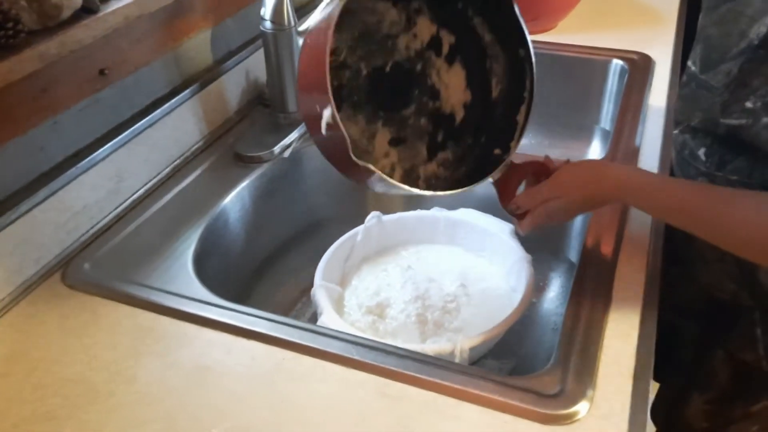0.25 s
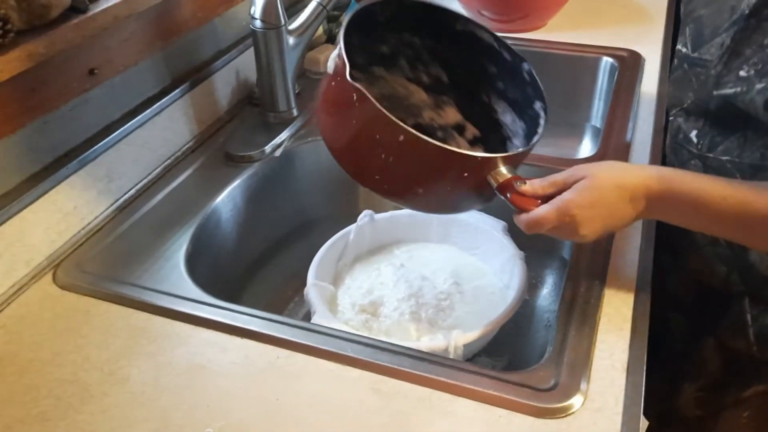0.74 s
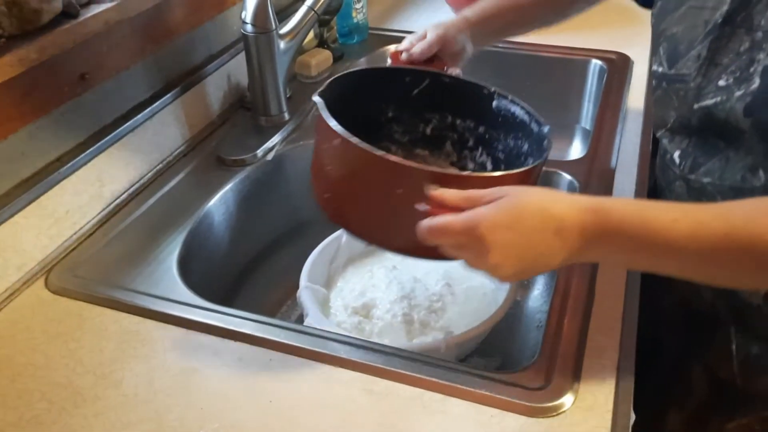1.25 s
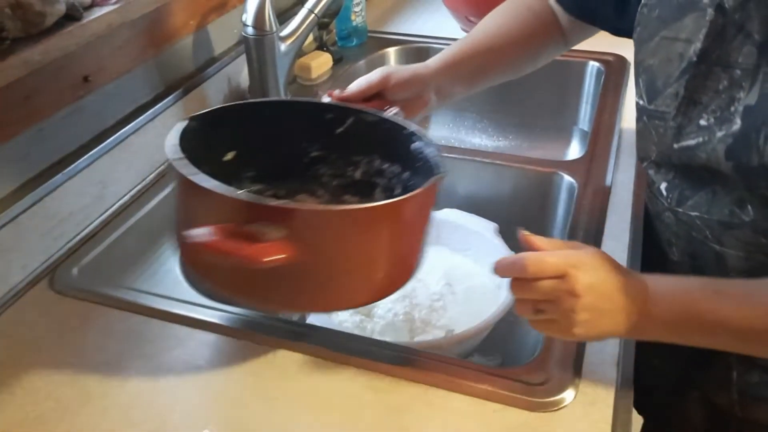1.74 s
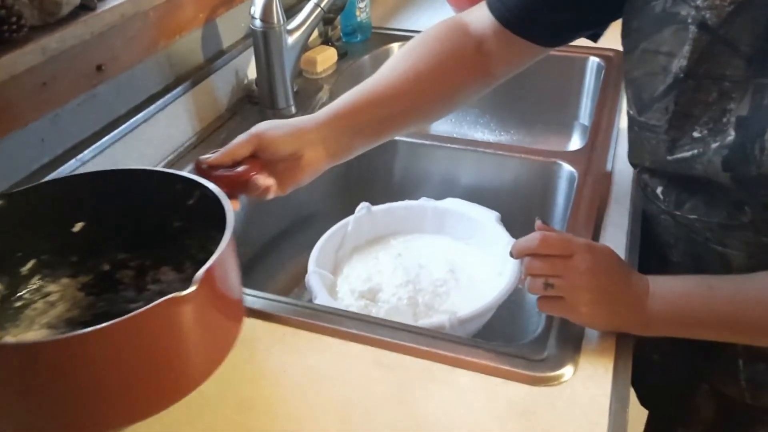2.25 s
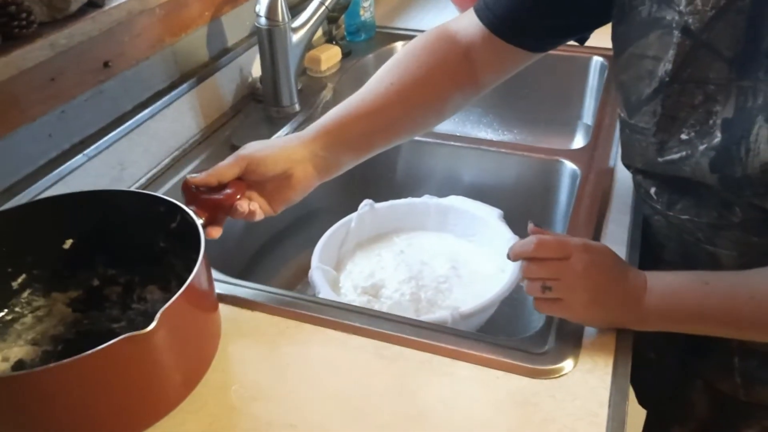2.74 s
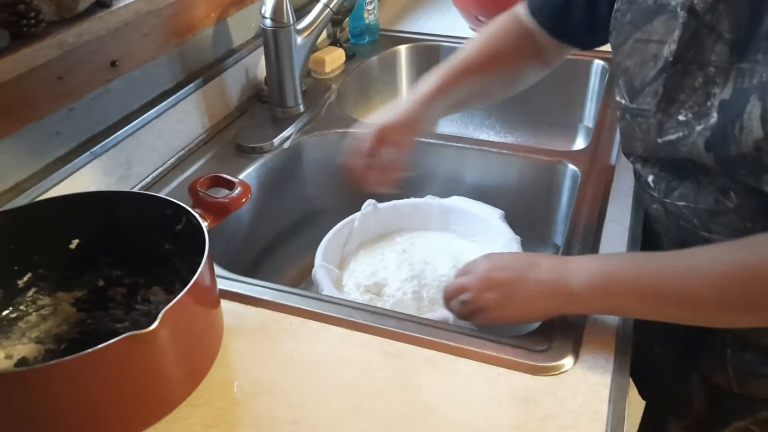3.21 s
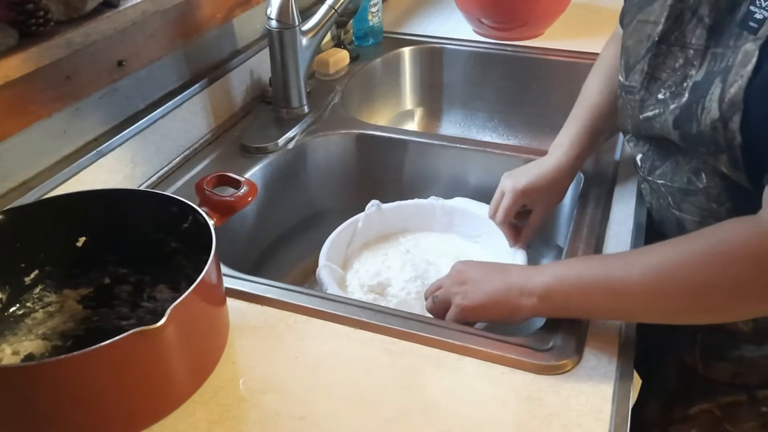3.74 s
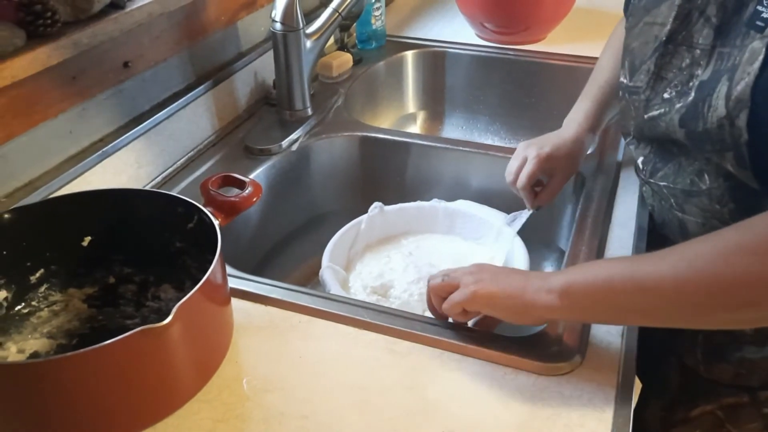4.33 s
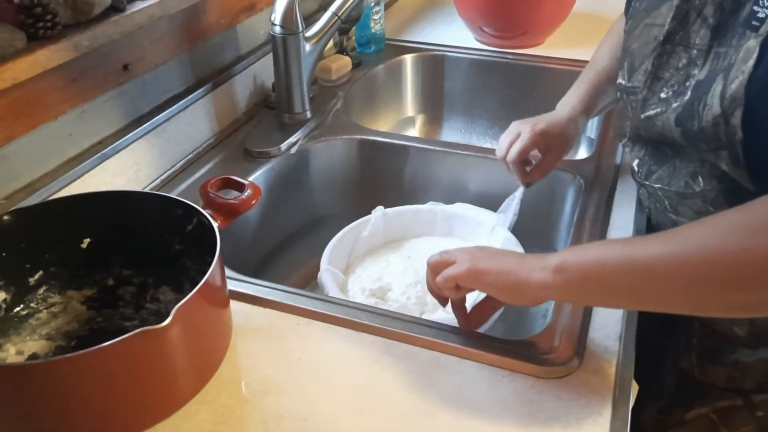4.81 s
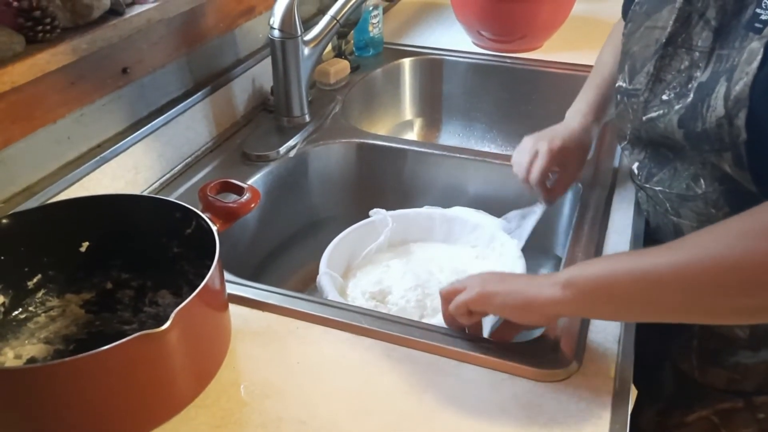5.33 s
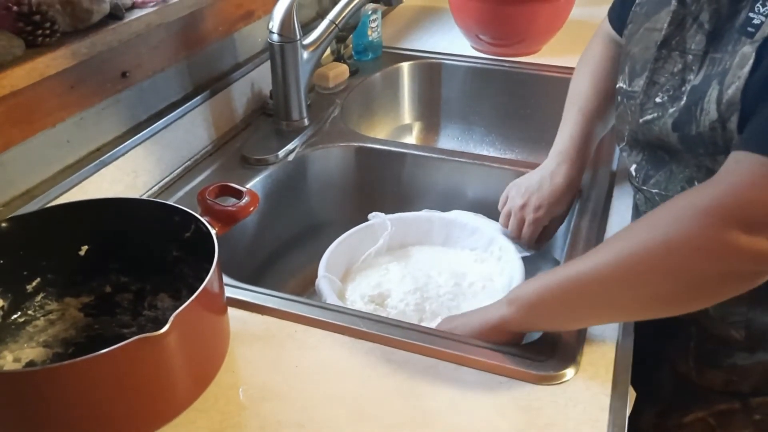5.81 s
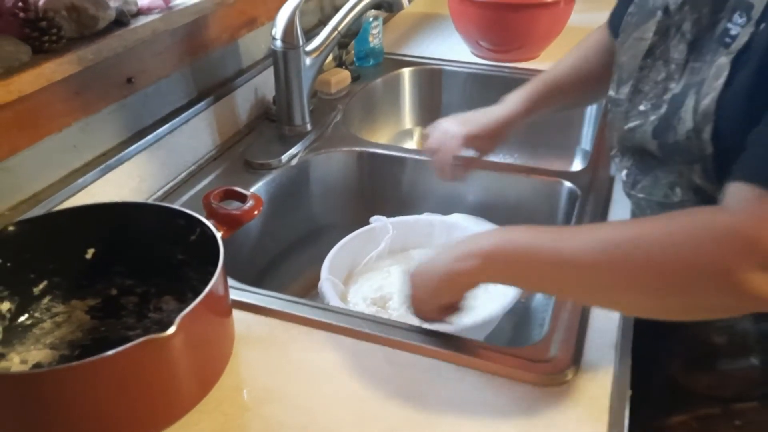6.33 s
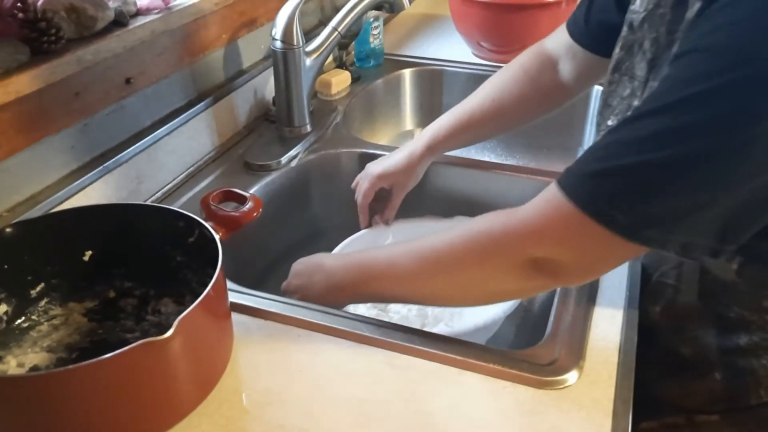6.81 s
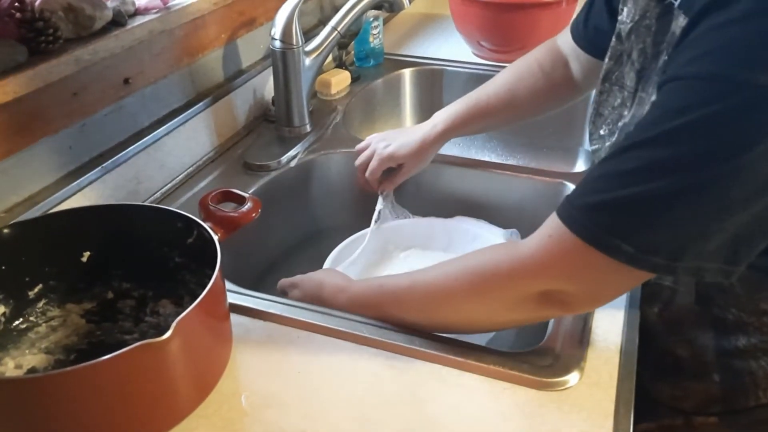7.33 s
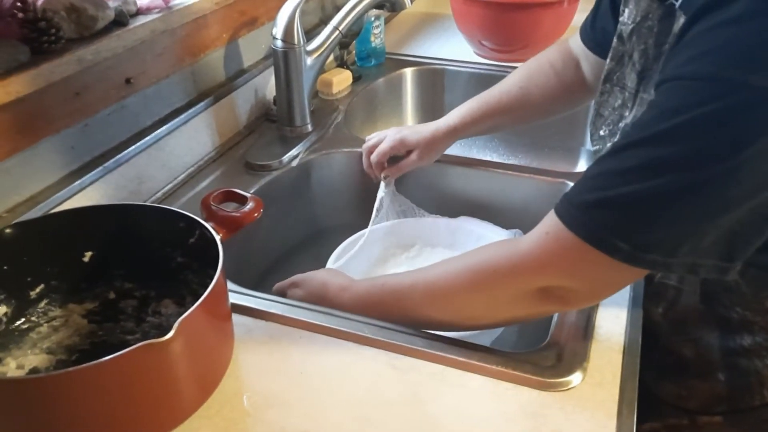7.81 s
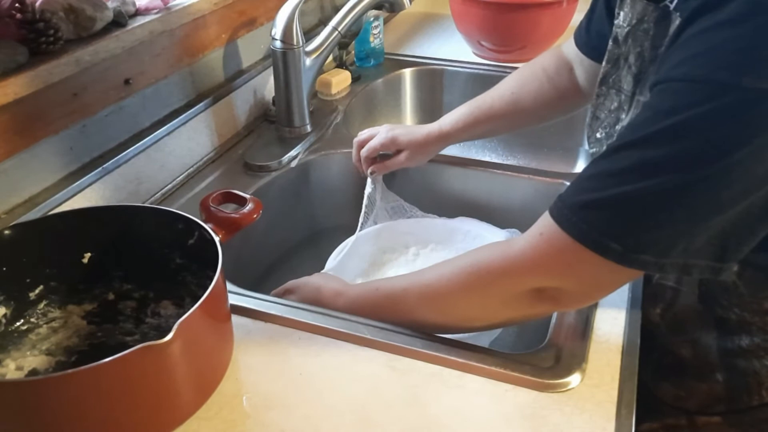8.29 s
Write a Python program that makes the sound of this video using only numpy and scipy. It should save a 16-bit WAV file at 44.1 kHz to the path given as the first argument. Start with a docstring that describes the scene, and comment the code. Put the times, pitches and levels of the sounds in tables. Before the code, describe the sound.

Close in a small kitchen, whey drips from fresh curds in a steel sink with hollow plops, tinny ticks and wet snaps. A heavy pot lands on the counter with a loud, ringing clunk, chatters and settles. Drips thin out as hands tug wet cloth with soft rustles and squelches. A fan hums faintly under thin hiss; the stereo microphone briefly dips after the blow.

```python
"""Draining curds at a kitchen sink

Whey drips and seeps from curds in a cloth-lined colander in a steel sink: ringing bubbles, splashes, wet snaps.
The emptied pot clunks onto the counter, chatters and settles: blows ring the modes of pot and counter.
Hands then gather the wet cloth, a patter of slipping fibres, and the colander knocks once.
A fan, noise through housing resonances, hums in the small room under a thin hiss.
The camera's two microphone ports hear it; its gain control ducks at the clunk and slowly recovers."""
import sys
import numpy as np
from scipy import signal
from scipy.fft import rfft, irfft, next_fast_len
from scipy.io import wavfile
from scipy.ndimage import uniform_filter1d, minimum_filter1d

SR = 44100
rng = np.random.default_rng(int(sys.argv[2]) if len(sys.argv) > 2 else 0)


def dump(signal):
    """Clip the signal to [-1, 1] and save it as 16-bit WAV at the path in sys.argv[1]."""
    limited = np.clip(np.atleast_2d(signal).T, -1, 1)
    pcm = np.round(limited * 32767).astype(np.int16)
    wavfile.write(sys.argv[1], SR, pcm)


N = 377491  # samples

# Modes of the loaded counter top. Each row: frequency in Hz, relative level in dB, 60 dB decay time in s.
COUNTER_MODES = [(67, -25.5, 0.24), (143.5, -2.5, 0.55), (204.3, -13.5, 0.41), (301, -10, 0.46),
                 (334, -13, 0.3), (397.2, -11.5, 0.78), (411.7, -0.5, 0.31), (573, -20.5, 0.8),
                 (602.7, -21.5, 0.28)]


def amp(db):
    """Decibels to gain."""
    return 10 ** (np.asarray(db) / 20)


def unit(x):
    """x at rms 1."""
    return x / np.sqrt(np.mean(x ** 2) + 1e-20)


def power(x, size):
    """Running mean square of a stereo sound over size samples."""
    return np.abs(uniform_filter1d(np.mean(x ** 2, axis=0), size)) + 1e-20


def burst(x):
    """A stereo sound whose loudest 10 ms have rms 1."""
    return x / np.sqrt(power(x, size=SR // 100).max())


def along(points, hz):
    """Read (Hz, value) points at hz, on a log frequency axis."""
    f, v = np.transpose(points)
    return np.interp(np.log(hz + 1), np.log(f + 1), v)


def filtered(x, response):
    """x times a response of frequency, padded so that its end does not wrap onto its start."""
    n = x.shape[-1]
    padded = next_fast_len(n + min(n // 4, SR // 5), real=True)
    spectrum = rfft(x, padded) * response(np.fft.rfftfreq(padded, 1 / SR))
    return irfft(spectrum, padded)[..., :n]


def coloured(x, spectrum):
    """x shaped by (Hz, dB) points, at rms 1."""
    return unit(filtered(x, lambda hz: amp(along(spectrum, hz))))


def resonance(hz, centre, width):
    """Response of one damped resonance, all in Hz."""
    return 1j * hz * width / (centre ** 2 - hz ** 2 + 1j * hz * width)


def air(n):
    """Stereo noise of a diffuse field: alike in the bass, nearly unrelated in the treble."""
    # Each row: frequency in Hz, likeness of left and right (1 is identical).
    likeness = [(60, 0.83), (300, 0.87), (640, .7), (1400, 0.42), (3100, 0.092), (7000, .02)]

    def mid_side(hz):
        turn = np.arccos(np.clip(along(likeness, hz), -1, 1)) / 2
        return np.array([np.cos(turn), np.sin(turn)])

    mid, side = filtered(rng.standard_normal((2, n)), mid_side)
    return np.array([mid + side, mid - side])


def add(track, s, sound):
    """Mix a sound in at s seconds, cut at the track's end."""
    part = track[:, round(s * SR):][:, :sound.shape[-1]]
    part += sound[..., :part.shape[-1]]


def fade(t, t60, attack):
    """A rise with time constant attack and an exponential decay of 60 dB in t60, in seconds."""
    return amp(-60 * t / t60) * (1 - np.exp(-t / attack))


def panned(x, left_db):
    """x with left over right by left_db."""
    return x * amp([[left_db / 2], [-left_db / 2]])


def kitchen(x, wet_db):
    """x with the small room's tail, a diffuse noise in which each frequency dies at its own speed."""
    # Each row: frequency in Hz, 60 dB decay time in s.
    room_decay = [(140, .38), (400, .58), (1200, .47), (5000, .44), (14000, .37)]
    hz, t, z = signal.stft(air(SR * 3 // 4), SR, nperseg=256)
    decay = fade(t, along(room_decay, hz)[:, None], attack=0.013)
    tail = signal.istft(z * decay, SR, nperseg=256)[1]
    tail = tail / np.linalg.norm(tail[0])
    return x + amp(wet_db) * signal.fftconvolve(x, tail, axes=1)[:, :x.shape[1]]


def basin(x, echo_db, t60):
    """A sound echoing densely between the sink's steel walls, scaled as a burst."""
    t = np.arange(SR // 10) / SR
    echoes = air(len(t)) * fade(t, t60, attack=.002)
    echoes = echoes / np.linalg.norm(echoes[0])
    reflected = signal.fftconvolve(np.atleast_2d(x), echoes, axes=1)[:, :x.shape[-1]]
    return burst(x + amp(echo_db) * reflected)


def stroke(start, length, attack, release):
    """Envelope of one movement: a linear rise, a hold and an exponential release, in seconds."""
    t = np.arange(N) / SR - start
    return np.clip(t / attack, 0, 1) * np.exp(-np.maximum(t - length, 0) / release)


def patter(per_second, spread_db, t60):
    """Countless small impacts of uneven size, each a short puff of noise."""
    sizes = amp(spread_db * np.clip(rng.standard_normal(N), -2, 2))
    hits = (rng.random(N) < per_second / SR) * sizes
    puff = fade(np.arange(SR // 4) / SR, t60, attack=.0005)
    energy = signal.fftconvolve(hits ** 2, puff ** 2)[:N]
    return air(N) * np.sqrt(np.abs(energy))


def background():
    """A fan drones through the resonances of its housing, under a thin steady hiss."""
    # Each row: frequency in Hz, relative level in dB per Hz.
    fan_spectrum = [(20, -29.5), (42, -19), (60, 3.5), (80, -9), (150, -3.5), (200, -4), (300, 1),
                    (520, -1.5), (680, -13.5), (920, -10), (1300, -32), (3000, -36), (8000, -70.5)]
    hiss_spectrum = [(1000, -7), (3400, -15), (4100, 3), (4900, -12.5), (5900, -2), (6900, 1), (7600, -7.5),
                     (8500, -15), (10000, -17.5), (15500, -16.5)]
    # Housing resonances. Each row: frequency in Hz, width in Hz, relative level in dB.
    housing = [(294, 29, -5.5), (305, 8.1, -5.5), (355.1, 11, 0.5), (470.5, 13, -2), (538, 16, -7.5),
               (591.5, 15, -10.5)]

    def housing_response(hz):
        return sum(amp(db) * np.abs(resonance(hz, centre, width)) ** 2 for centre, width, db in housing)

    drone = unit(filtered(air(N), housing_response))
    fan = amp(-59.5) * drone + amp(-60.5) * coloured(air(N), fan_spectrum)
    return panned(fan, left_db=-0.2) + amp(-71) * coloured(air(N), hiss_spectrum)


def handling():
    """Per sample, the strength of the cloth's rubbing and of the whey's flow; each pull raises both."""
    # Whey from the freshly poured curds. Each row: time in seconds, relative flow in dB.
    drain = [(0.0, -71), (1.0, -69), (1.09, -65), (1.53, -63.5), (1.67, -65), (2.48, -66)]
    # Hands pull and squeeze the cloth.
    # Each row: start in seconds, length in seconds, relative rustle in dB, relative flow in dB.
    pulls = [(4.196, 0.23, -78, -73), (4.93, 0.052, -69.5, -75), (5.286, 0.22, -68, -82),
             (5.64, 0.13, -76, -70.5), (5.95, 0.11, -74, -66.5), (6.351, 0.31, -77, -77.5),
             (6.853, 0.2, -79, -75.5), (7.09, .06, -76, -64), (7.68, .15, -71.5, -74),
             (7.86, 0.082, -70, -63), (8.083, 0.37, -74, -61.5)]
    fall_db_per_s = 5.5  # after the last drain row the curds run dry
    t, (s, db) = np.arange(N) / SR, np.transpose(drain)
    flow = amp(np.interp(t, s, db) - fall_db_per_s * np.maximum(t - s[-1], 0))
    rubbing = np.zeros(N)
    for start, length, rustle_db, flow_db in pulls:
        pull = stroke(start, length, attack=0.024, release=0.042)
        rubbing = np.hypot(rubbing, amp(rustle_db) * pull)
        flow = np.hypot(flow, amp(flow_db) * pull)
    return rubbing, flow


def plink(t, hz, t60, glide):
    """A trapped bubble's ring: it swells over a few cycles and bends in pitch by the share glide as it dies."""
    life = np.minimum(t / t60, 1)
    swell = 1 - np.exp(-(t * hz / 2.7) ** 2)
    pitch_hz = hz * (1 + glide * (life - .25))
    return np.sin(2 * np.pi * np.cumsum(pitch_hz) / SR) * swell * amp(-60 * t / t60)


def bubbles(per_second, low_hz, high_hz, t60, spread_db):
    """Countless tiny bubbles of uneven size and pitch, echoing in the sink."""
    out, t = np.zeros((2, N)), np.arange(SR // 25) / SR
    for when, size, bend, side, loud in rng.random((int(per_second * N / SR), 5)):
        ring = plink(t, low_hz * (high_hz / low_hz) ** size, t60, glide=0.7 * bend)
        # spread from the middle towards the right
        add(out, when * N / SR, panned(ring, left_db=6.5 * (side - 1.0)) * amp(spread_db * loud))
    return kitchen(basin(out, echo_db=4.0, t60=0.17), wet_db=-11)


def seep(rubbing, flow):
    """Fine droplets trickle through the colander while the wet cloth fizzes, following flow and rubbing."""
    # Each row: frequency in Hz, relative level in dB per Hz.
    trickle_spectrum = [(500, -32), (900, 1), (1170, -7.5), (1600, -7.5), (2000, -9.5), (2450, -16),
                        (2900, 0), (3400, -9.5), (5000, -9), (9000, -28)]
    fizz_spectrum = [(2500, -29.5), (4500, -9.5), (6500, 6), (9500, -1.5), (12500, 4), (15500, -5.5)]
    large = bubbles(per_second=140, low_hz=824.6, high_hz=3370, t60=0.026, spread_db=22)
    trickle = coloured(large, trickle_spectrum)
    small = bubbles(per_second=170, low_hz=4155, high_hz=13550, t60=.004, spread_db=9)
    fizz = coloured(small, fizz_spectrum)
    # droplets that trap no air
    spray = coloured(patter(per_second=180, spread_db=7, t60=.06), trickle_spectrum)
    fizz_level = np.hypot(amp(-14) * flow, amp(-4.5) * rubbing)
    return flow * (amp(-2) * trickle + amp(-8) * spray) + fizz_level * fizz


def drop(plop_hz, plop_db, tick_hz, tick_db):
    """One drop splashes on the steel and rings the shallow hollow under the colander."""
    # Spatter on steel. Each row: frequency in Hz, relative level in dB per Hz.
    tick_spectrum = [(900, -28), (1400, -16), (2000, -1), (2900, 0.5), (3300, -17), (3700, -12.5),
                     (5000, -18), (9000, -22.5)]
    t = np.arange(SR // 8) / SR
    splash = air(len(t)) * fade(t, t60=0.067, attack=0.0006)

    hollow = unit(filtered(splash, lambda hz: resonance(hz, plop_hz, 680) ** 4))
    cycles = 40  # within the 60 dB decay: bigger, lower bubbles ring longer
    bubble = plink(t, plop_hz, t60=cycles / plop_hz, glide=rng.normal(-0.069, .1))
    plop = unit(bubble) + amp(-3.5) * hollow

    spatter = unit(filtered(splash, lambda hz: resonance(hz, tick_hz, 890) * amp(along(tick_spectrum, hz))))
    contact = unit(rng.standard_normal((2, len(t))) * fade(t, t60=.012, attack=.0002))
    ping = unit(plink(t, tick_hz, t60=0.018, glide=rng.normal(0, 0.037)))
    tick = spatter + amp(1) * ping + amp(-19) * contact

    plop_in_sink = amp(plop_db - 1.7) * basin(plop, echo_db=-1, t60=0.12)
    return plop_in_sink + amp(tick_db - 2.46) * basin(tick, echo_db=2.0, t60=0.09)


def drips(flow):
    """Heavy drops plop in pooled whey or tick on steel; others fall at random, scaled by the flow."""
    # Drops into pooled whey.
    # Each row: time in seconds, pitch in Hz, relative level in dB, splash over plop in dB.
    plops = [(0.122, 1162, -48.5, -19), (0.345, 1172, -52.5, -36), (0.409, 815, -46.5, -42),
             (1.053, 1196, -45, -12), (1.079, 1183, -46.5, -14), (1.148, 1102, -44, -28),
             (1.167, 1098, -41.5, -26), (1.203, 1167, -46, -17), (1.31, 1223, -48.5, -26),
             (1.564, 1170, -50.5, -24), (1.61, 1157, -41.5, -20), (1.712, 1410, -56.5, -22),
             (1.745, 1154, -45, -20), (1.83, 1137, -52, -22), (1.918, 1150, -47.5, -3),
             (2.11, 1190, -46, -8), (2.125, 1141, -46.5, -19), (2.249, 1170, -53.5, -11),
             (2.853, 1160, -50, -6), (2.971, 1158, -50, -10), (3.278, 1132, -41, -29),
             (3.428, 1118, -42.5, -23), (4.351, 1200, -51, -2), (4.37, 1140, -43, -14),
             (4.447, 1186, -48.5, -18), (4.463, 1152, -44.5, -30), (4.836, 1094, -41, -26),
             (5.648, 773, -37.5, -22), (5.695, 774, -48, -15), (5.787, 1190, -44.5, -7),
             (5.943, 1224, -37.5, -9.5), (5.961, 1180, -39, -3), (6.448, 1189, -48.5, -18),
             (8.073, 1082, -53.5, -14), (8.143, 1135, -56, 0), (8.194, 1146, -48, -6),
             (8.467, 1143, -50.5, 5)]
    # Drops on bare steel. Each row: time in seconds, pitch in Hz, relative level in dB.
    ticks = [(0.093, 1676, -53), (0.533, 1545, -50), (0.649, 3560, -56.5), (0.757, 2660, -58.5),
             (0.869, 2780, -51.5), (0.959, 2970, -61.5), (1.486, 2605, -47.5), (1.514, 1790, -56),
             (1.647, 2280, -53.5), (1.685, 2380, -52.5), (1.978, 1696, -49), (2.314, 2810, -55.5),
             (2.489, 2690, -48.5), (3.182, 2510, -46.5), (3.6, 2320, -59.5), (3.711, 1600, -47),
             (3.842, 1850, -54), (3.87, 3300, -48), (4.244, 1900, -46.5), (4.596, 2440, -58),
             (4.744, 3050, -61), (4.933, 2630, -41.5), (5.282, 2740, -45.5), (5.371, 2520, -47),
             (5.514, 2830, -54), (5.754, 2590, -55.5), (6.036, 2500, -49), (6.084, 2890, -55.5),
             (6.857, 2660, -59.5), (6.942, 2670, -64), (7.105, 2000, -56), (7.256, 2840, -65),
             (7.73, 2160, -54), (7.874, 2290, -61), (7.925, 3000, -59.5), (8.211, 2200, -47),
             (8.28, 2110, -53), (8.353, 2920, -45.5), (8.41, 2410, -51.5), (8.545, 2140, -48.5)]
    splash_hz, hollow_hz = 2776, 1173
    hollow_fall_db = 15  # per octave: the higher a tick lies above the hollow, the less it wakes it
    strays_per_s = 10
    out = np.zeros((2, N))
    for s, hz, db, splash_db in plops:
        add(out, s, drop(hz, db, splash_hz, db + splash_db))
    for s, hz, db in ticks:
        hollow_db = db - 1 - hollow_fall_db * np.log2(hz / hollow_hz)
        add(out, s, drop(hollow_hz, hollow_db, hz, db))
    for when, size, pitch, splash in rng.random((int(strays_per_s * N / SR), 4)):
        db = 3.5 + 7 * size  # relative to the flow
        stray = drop(hollow_hz * 1.3 ** (pitch - .5), db, splash_hz * 1.5 ** (splash - .8), db - 5)
        add(out, when * N / SR, flow[int(when * N)] * stray)
    return kitchen(out, wet_db=-9.0)


def smack(centre_hz):
    """A wet film parts in a quick cluster of tiny snaps."""
    t = np.arange(SR // 6) / SR
    # cubed noise is sparse and spiky
    snaps = rng.standard_normal(len(t)) ** 3 * fade(t, t60=0.013, attack=0.0011)
    film = filtered(snaps, lambda hz: resonance(hz, centre_hz, 1400) * resonance(hz, 6800, 12000))
    return basin(film, echo_db=8.0, t60=0.03)


def squelches(rubbing):
    """Wet curd and cloth smack clearly a few times, and at random as strongly as the cloth is rubbed."""
    # Each row: time in seconds, centre in Hz, relative level in dB.
    smacks = [(0.408, 6950, -56.5), (0.49, 7140, -61.5), (1.567, 4470, -57.5), (1.611, 12200, -53.5),
              (1.688, 6800, -52.5), (1.745, 7050, -75), (1.761, 7660, -59), (1.977, 6300, -57),
              (2.314, 4454, -60.5), (2.483, 5600, -55.5), (3.181, 4340, -51), (5.281, 6540, -56),
              (5.446, 6440, -55.5), (5.551, 4850, -57), (5.648, 4960, -57.5), (5.696, 6750, -58),
              (5.96, 5160, -59.5), (6.06, 6380, -63.5), (6.24, 5180, -66), (7.871, 9150, -57),
              (8.071, 5840, -55), (8.163, 6100, -59), (8.356, 5510, -60)]
    random_per_s, random_hz, random_db = 10, 5600, 5  # level over the rubbing
    out = np.zeros((2, N))
    for s, centre_hz, db in smacks:
        add(out, s, amp(db - 1.0) * smack(centre_hz))
    for when, pitch in rng.random((int(random_per_s * N / SR), 2)):
        level = amp(random_db) * rubbing[int(when * N)]
        add(out, when * N / SR, level * smack(random_hz * 1.6 ** (pitch - .5)))
    return kitchen(out, wet_db=-3.5)


def counter(t, attack):
    """The counter top's low modes after one push."""
    return sum(-amp(db) * np.cos(2 * np.pi * hz * t) * fade(t, t60, attack) for hz, db, t60 in COUNTER_MODES)


def pot_wall(t, chatter, port_lag):
    """The pot's ring: chatter feeds the low modes longest; each mode reaches the ports unequally."""
    # Each row: frequency in Hz, relative level in dB, 60 dB decay time in s.
    wall_modes = [(935, -15, 0.23), (1024, -13.5, 0.15), (1166, -6, 0.27), (1180, -1, 0.39),
                  (1285, -20, .25), (1410, -16.5, 0.12), (1738, 1, 0.19), (2070, -10.5, .25),
                  (2350, -4.5, 0.32), (2710, -15, 0.34), (3036, -6.5, 0.21), (3640, -9, 0.32),
                  (3730, -17.5, 0.42), (3960, -20.5, .33), (4570, -17, 0.3), (4750, -4.5, .2),
                  (5900, -16.5, 0.4), (6300, -18.5, 0.32), (6800, -14.5, 0.22), (8120, -24.5, .26)]
    ring = np.zeros((2, len(t)))
    lead = np.array([[1], [-1]]) * port_lag / 2  # s, left ahead of right
    for hz, db, t60 in wall_modes:
        fed = chatter * min(1, (1800 / hz) ** 2)  # s
        level = (1 - np.exp(-t / (fed / 6))) * amp(-60 * np.maximum(t - fed, 0) / t60)
        ring += amp(db + rng.normal(0, 1, (2, 1))) * np.sin(2 * np.pi * hz * (t + lead)) * level
    return ring


def nudge():
    """The pot is nudged along: its base sticks and slips at the counter's main mode, with a scrape."""
    phase = 2 * np.pi * COUNTER_MODES[1][0] * np.arange(N) / SR
    judder = np.sin(phase) + amp(-7.5) * np.sin(phase / 2)
    scrape = unit(filtered(air(N), lambda hz: resonance(hz, 320, 192.5) ** 2))
    push = stroke(start=2.878, length=0.061, attack=0.0052, release=0.0096)
    return amp(-38) * push * (judder + amp(-4.5) * scrape)


def clunk():
    """The pot lands on one edge, chatters flat and rocks once more; each blow thuds, booms and cracks."""
    # The base meets the counter.
    # Each row: time in seconds, then relative levels in dB of thud, counter boom and crack.
    blows = [(2.522, 2, -5.5, -9.5), (2.5357, -10.5, -30, -24), (2.5407, -6.5, -28.5, -37),
             (2.566, -19.5, -30.5, -21), (2.578, -1, -23.5, -19.5), (2.713, -6.5, -25, -27.5)]
    # Each row: frequency in Hz, relative level in dB per Hz.
    crack_spectrum = [(100, -23), (400, 0), (900, 2), (1500, -5.5), (2600, -3), (4000, -6.5), (5500, -3.5),
                      (7000, -7.5), (9000, -13.5), (12000, -13.5), (15500, -26)]
    seated_s = 2.92  # from here the base lies flat and deadens the ringing
    thud_hz = 355
    body, bright, t = np.zeros((2, N)), np.zeros((2, N)), np.arange(SR * 3 // 4) / SR
    for s, thud_db, boom_db, crack_db in blows:
        thud = -np.sin(2 * np.pi * thud_hz * t) * fade(t, t60=0.028, attack=0.00031)
        # the cabinet below rattles in many crowded modes
        rattle = filtered(rng.standard_normal((2, len(t))), lambda hz: resonance(hz, 200, 560) ** 2)
        cabinet = unit(rattle) * fade(t, t60=0.27, attack=0.0013)
        boom = amp(boom_db) * counter(t, attack=0.0036)
        add(body, s, amp(thud_db) * (thud + amp(-15) * cabinet) + boom)
        # a hard contact, then the sizzle of many high modes
        contact = fade(t, t60=0.025, attack=.0003) + amp(-11.5) * fade(t, t60=0.39, attack=.0015)
        bright_hz = 40000 * amp(crack_db)  # gentler contacts sound duller
        noise = coloured(air(len(t)), crack_spectrum)
        crack = unit(filtered(noise, lambda hz: 1 / np.hypot(1, hz / bright_hz)))
        add(bright, s, amp(crack_db) * crack * contact)
    add(bright, blows[0][0], amp(-16.5) * pot_wall(t, chatter=0.049, port_lag=.0001))
    deadened = amp(-125 * np.maximum(np.arange(N) / SR - seated_s, 0))  # 125 dB per second
    low = kitchen(body * deadened + nudge(), wet_db=-14.0)
    high = kitchen(bright * deadened, wet_db=-18.0)
    return panned(low, left_db=3.5) + panned(high, left_db=-0.3)


def cloth(rubbing):
    """Countless wet fibres slip as the cloth is gathered."""
    # Each row: frequency in Hz, relative level in dB per Hz.
    rustle_spectrum = [(900, -17.5), (2000, 13), (2700, 10), (3500, -16), (4500, -4), (6000, 16),
                       (8000, -25), (11000, -38), (15500, -8)]
    slips = patter(per_second=320, spread_db=7, t60=.04)
    return amp(-3.0) * rubbing * coloured(slips, rustle_spectrum)


def knock():
    """The colander knocks the sink as the cloth is tugged, ringing briefly under its load of curds."""
    # Each row: frequency in Hz, relative level in dB, 60 dB decay time in s.
    colander = [(2450, 2.5, .22), (2875, 2, .25), (4410, -2.5, 0.25), (5390, -2, 0.13)]
    out, t = np.zeros((2, N)), np.arange(SR // 3) / SR
    ring = sum(amp(db) * np.sin(2 * np.pi * hz * t) * fade(t, t60, attack=.001) for hz, db, t60 in colander)
    in_sink = basin(ring, echo_db=-7, t60=.08)
    add(out, 5.961, amp(-54) * kitchen(in_sink, wet_db=-9))
    return out


def scene():
    """Everything heard at the sink."""
    rubbing, flow = handling()
    whey = drips(flow) + squelches(rubbing) + seep(rubbing, flow)
    return whey + cloth(rubbing) + knock() + clunk() + background()


def gain_control(x, ceiling_db, hold, recover_db):
    """Loud sound turns the gain down at once; after hold seconds it climbs by recover_db a second."""
    need = np.minimum(0, ceiling_db - 10 * np.log10(power(x, size=SR // 100)))
    ramp = recover_db * np.arange(N) / SR
    climbing = np.minimum.accumulate(need - ramp) + ramp
    half = int(hold * SR / 2)
    held = minimum_filter1d(climbing, 2 * half + 1, origin=half)
    ahead = minimum_filter1d(held, size=SR // 50)  # begins 10 ms early
    return x * amp(uniform_filter1d(ahead, size=SR // 200))


def record(dry):
    """Two unequal microphone ports, a low cut, gain control and the band limit."""
    # Each row: frequency in Hz, left port over right in dB.
    ports = [(100, 0), (300, -2.5), (1200, 1.5), (2500, -1), (4400, -6), (7500, -10), (8800, 6.5),
             (10000, 7), (13000, 2.5)]
    low_hz, top_hz = 25, 15800

    def microphone(hz):
        low_cut = (1j * hz / (1j * hz + low_hz)) ** 2
        return low_cut * amp(np.array([[.5], [-.5]]) * along(ports, hz))

    heard = filtered(dry, microphone)
    levelled = gain_control(heard, ceiling_db=-13.0, hold=.6, recover_db=6.5)
    return filtered(levelled, lambda hz: hz < top_hz)


dry = scene()
out = record(dry)
dump(out)
```